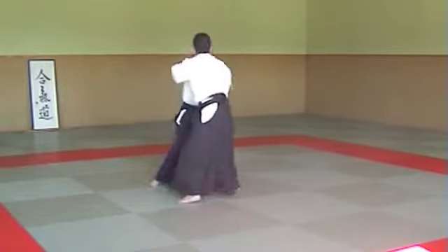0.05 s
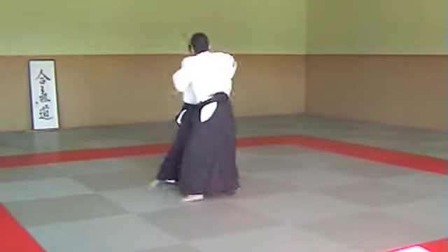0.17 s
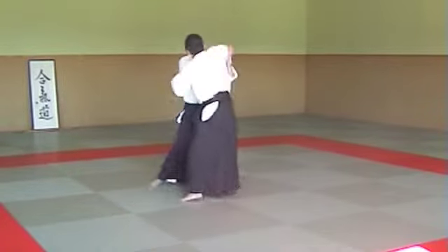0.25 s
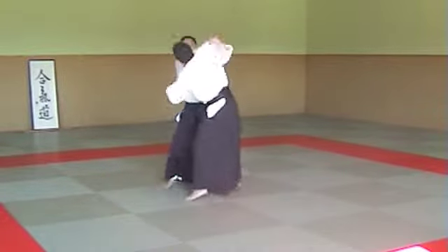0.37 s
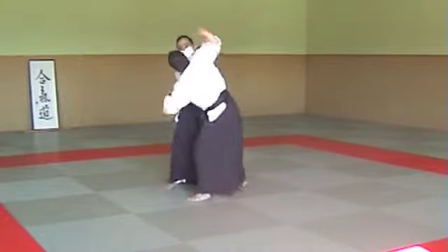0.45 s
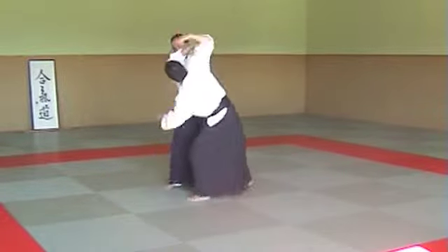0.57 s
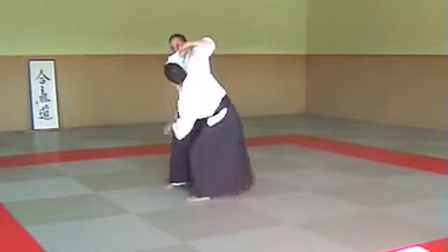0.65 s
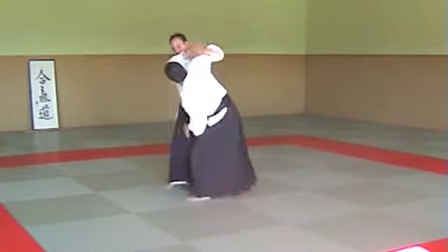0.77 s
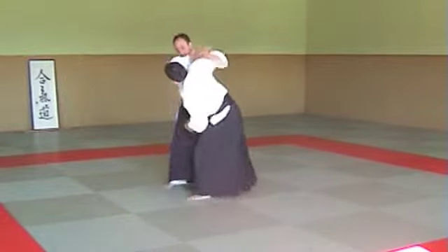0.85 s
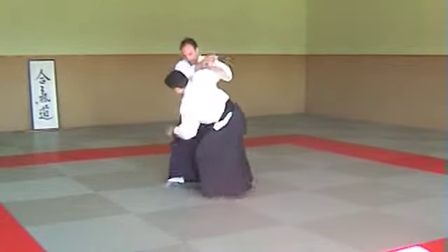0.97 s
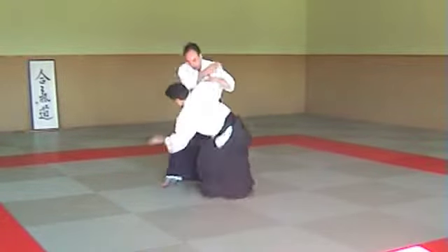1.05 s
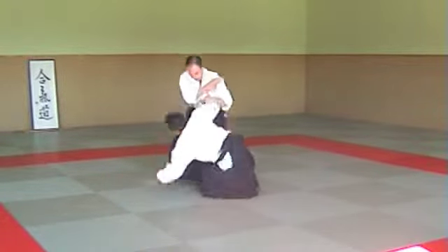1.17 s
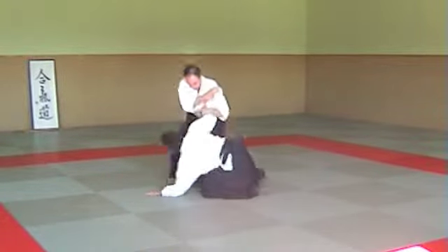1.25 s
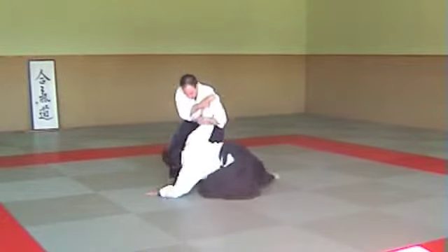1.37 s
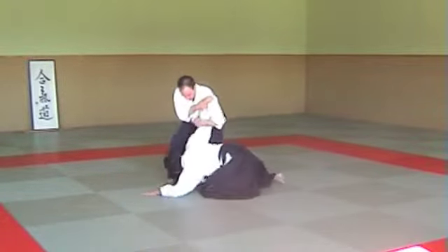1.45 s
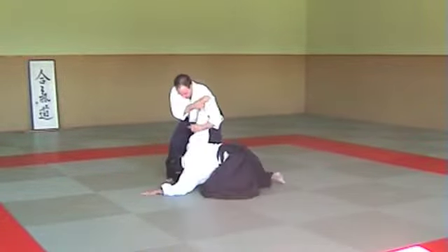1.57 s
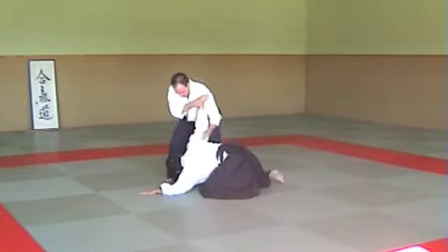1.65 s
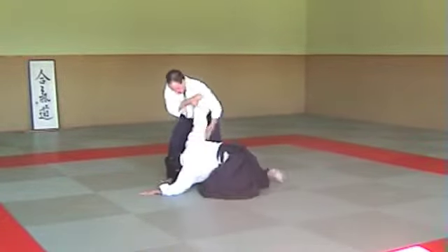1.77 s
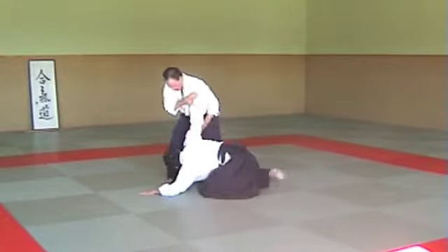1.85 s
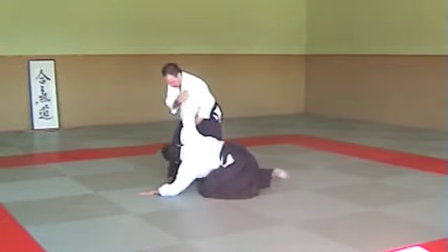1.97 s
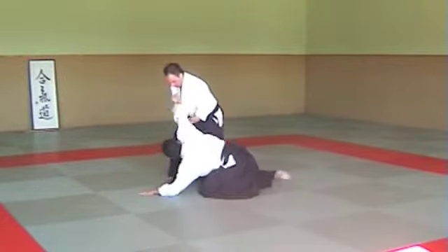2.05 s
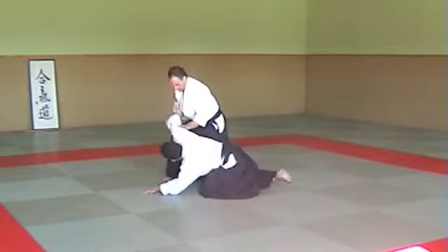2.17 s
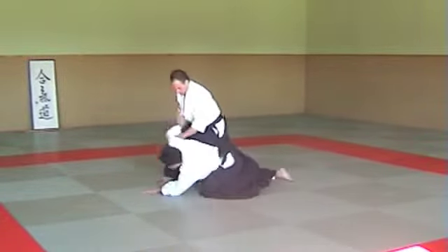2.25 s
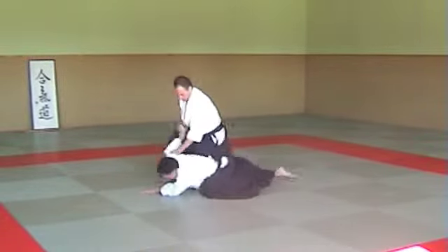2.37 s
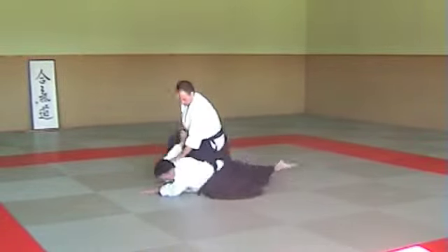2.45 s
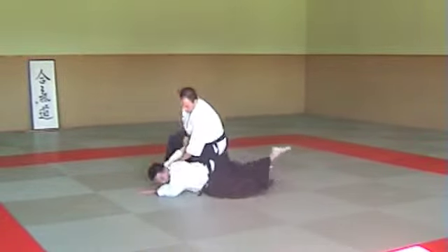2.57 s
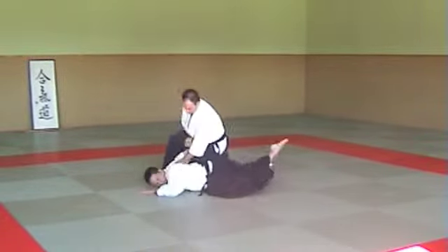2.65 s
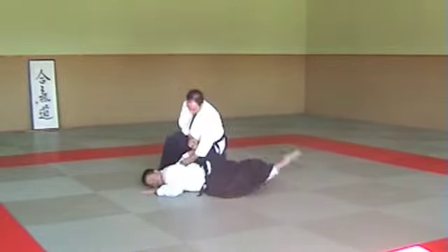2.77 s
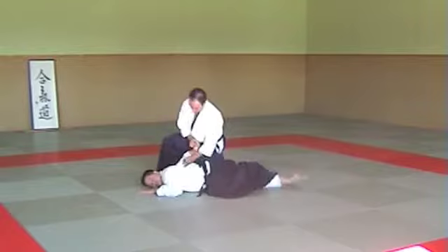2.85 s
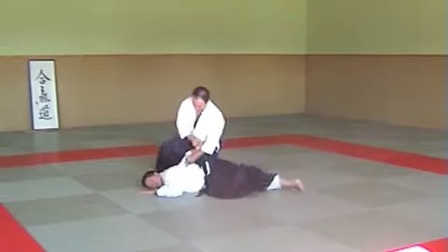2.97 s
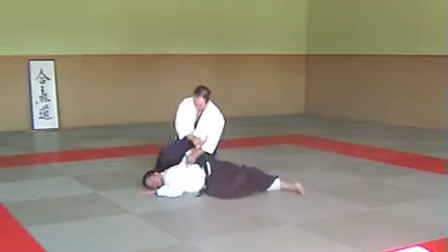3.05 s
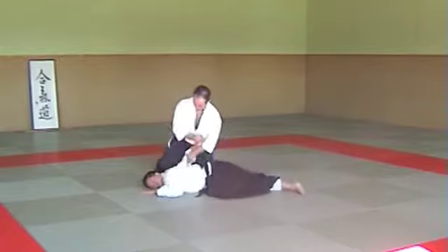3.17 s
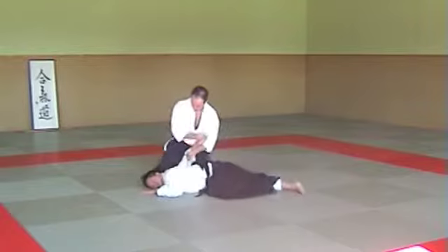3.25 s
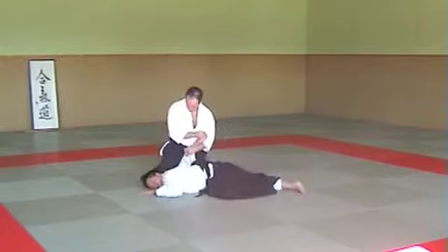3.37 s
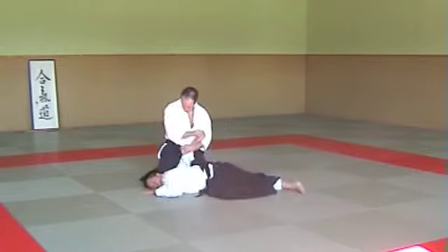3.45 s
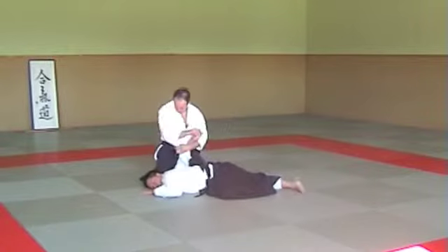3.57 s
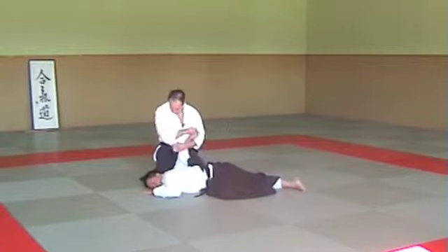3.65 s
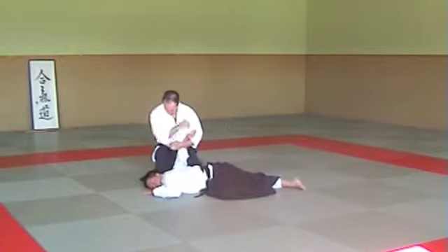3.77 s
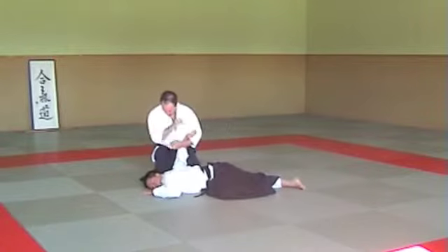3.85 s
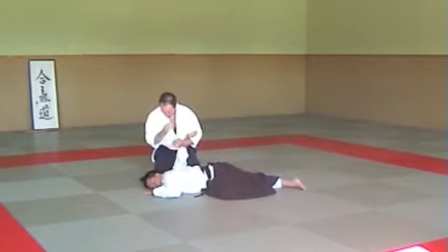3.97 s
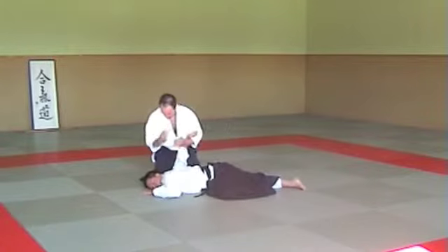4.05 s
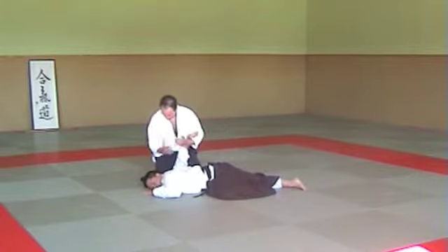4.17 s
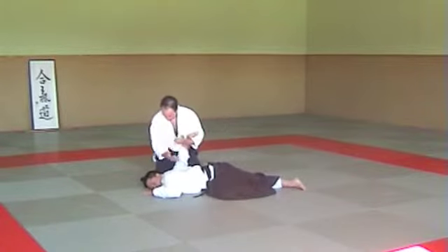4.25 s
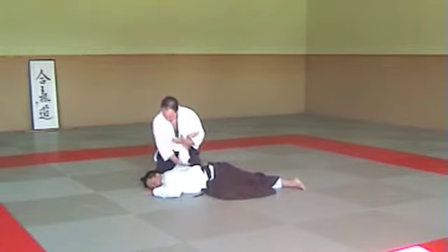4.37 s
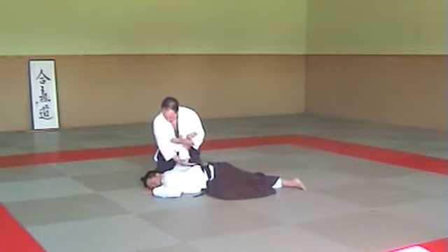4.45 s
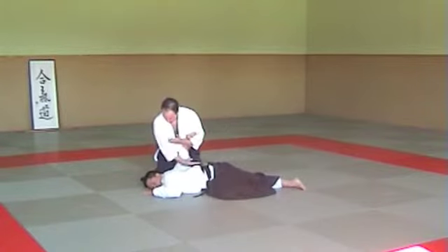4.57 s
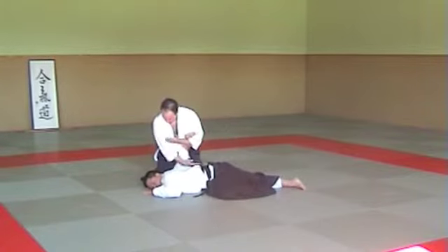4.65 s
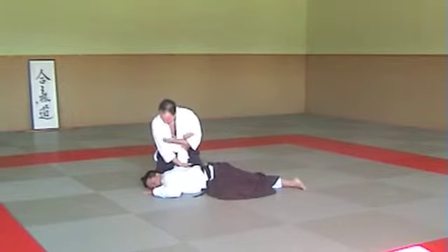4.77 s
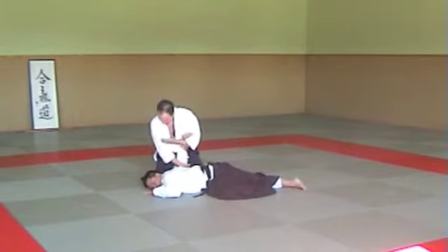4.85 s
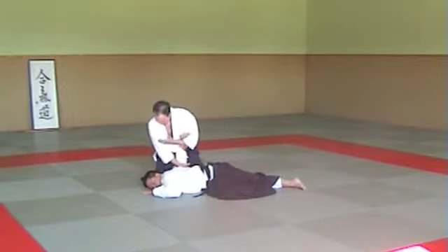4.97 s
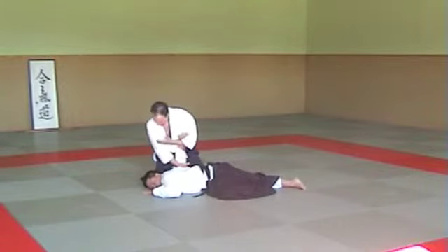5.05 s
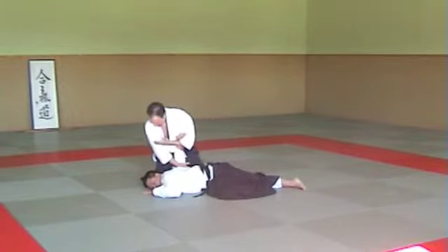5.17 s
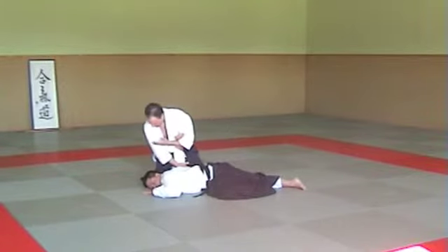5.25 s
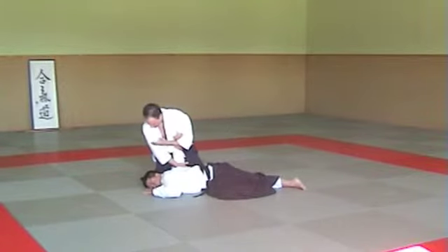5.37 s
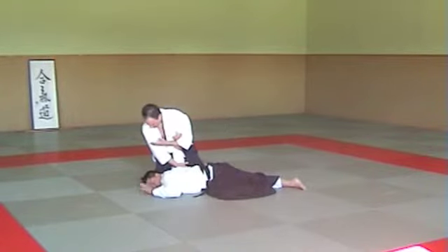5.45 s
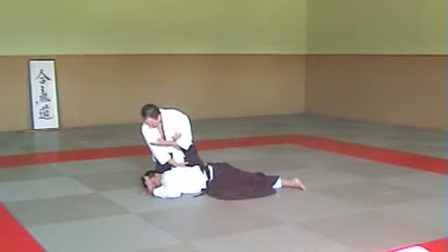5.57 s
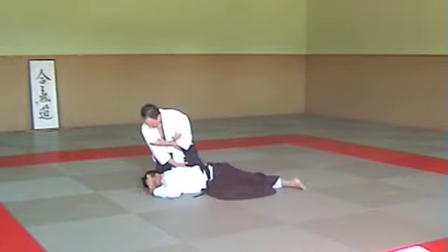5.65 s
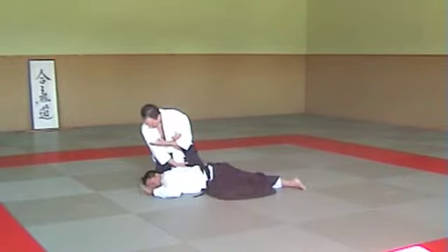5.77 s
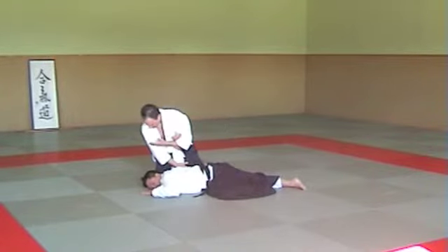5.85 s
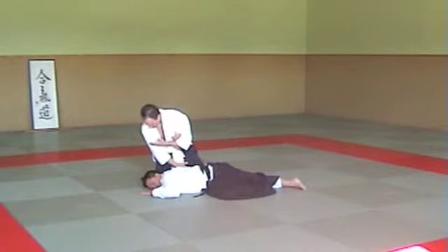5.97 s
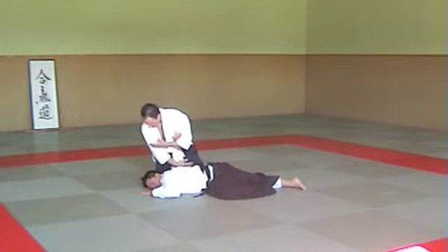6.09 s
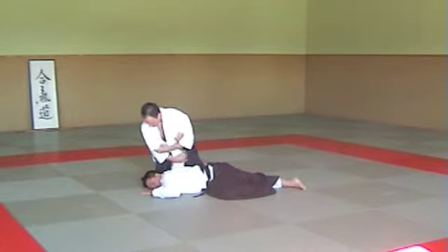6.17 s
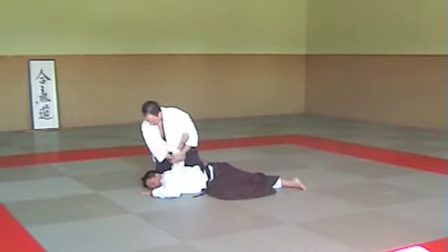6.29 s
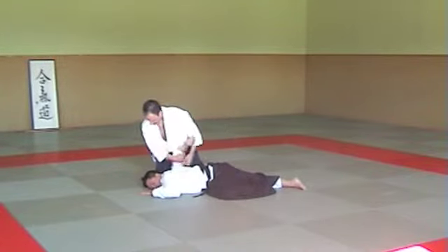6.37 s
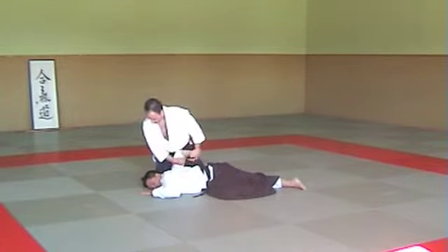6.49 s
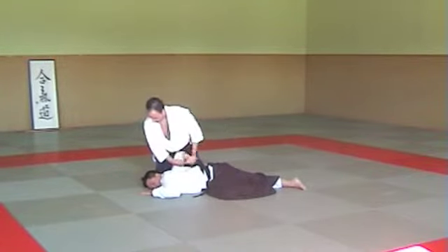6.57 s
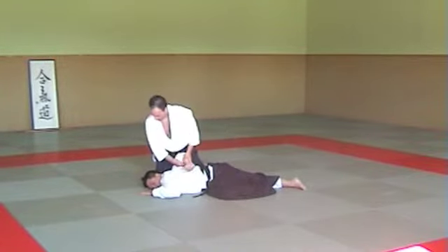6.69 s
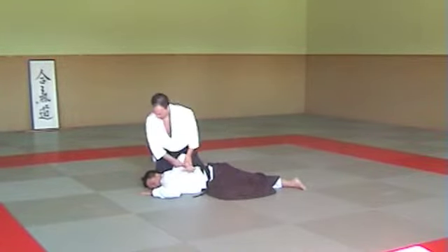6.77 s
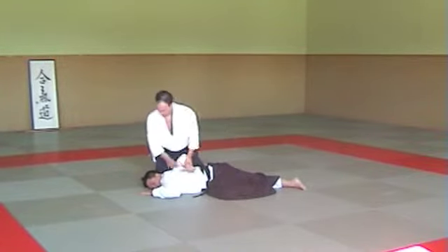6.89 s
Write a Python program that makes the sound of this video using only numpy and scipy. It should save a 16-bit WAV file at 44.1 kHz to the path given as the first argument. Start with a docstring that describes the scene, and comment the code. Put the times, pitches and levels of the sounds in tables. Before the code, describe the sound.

Bare feet slide and step on padded mats while heavy cotton rustles and air rumbles softly over the microphones. A body drops with a loud thump and slap, then is put down flat with a lighter smack. After a quieter stretch of shifting and rustling, a hand strikes the mat hard. Each blow echoes through a large training hall, heard from a few metres away.

```python
"""A body drops onto padded mats and is slapped down flat as two people practise a throw and a pin;
at the end of the pin a hand strikes the mat hard. Weight thumps the mat and rings the floor beneath,
and air squeezed from under a limb cracks. Between the blows heavy cotton rustles and bare feet slide.
The place is a large, echoing training hall, where faint tones ring now and then. A close pair of
microphones a few metres away hears mostly the hall; early on, air wafts over them in a soft rumble."""
import sys
import numpy as np
from scipy import signal
from scipy.fft import rfft, irfft, next_fast_len
from scipy.io import wavfile

SR = 44100
rng = np.random.default_rng(int(sys.argv[2]) if len(sys.argv) > 2 else 0)


def dump_mix(stems):
    """Bounce the given channels to the path in sys.argv[1] as a 16-bit WAV at rate SR."""
    frames = np.atleast_2d(stems).T  # one column per channel
    limited = np.clip(frames, -1, 1)  # hard clip at full scale
    pcm = np.round(limited * 32767).astype(np.int16)
    wavfile.write(sys.argv[1], SR, pcm)


N = 305172
TIME = np.arange(N) / SR

# Room tone and microphone hiss. Each row: frequency in Hz, relative spectral level in dB.
AIR_COLOUR = [(15, -57), (25, -3.5), (79, -16), (110, -2.5), (421, -4.5), (482, 1.5), (804, -8.5),
              (1050, -6), (1170, -8.5), (1570, -14), (1710, -14.5), (3440, -20), (15500, -26.5)]
# Stereo width at the microphones. Each row: frequency in Hz, side minus mid in dB.
AIR_WIDTH = [(40, -7), (140, -0.5), (280, -2.5), (1100, -7.5), (2200, -5), (4400, -3), (14000, 0)]  # room tone and draught
HALL_WIDTH = [(40, -13.5), (140, -33), (280, -26.5), (1100, -15), (2200, -11.5), (4400, -6), (8000, -0.5),
              (14000, -2.5)]  # the hall's wash and all rubbing

# Swells of noise. Each row: peak time in seconds, relative level in dB, rise and fall in seconds.
MIC_DRAUGHTS = [(.08, -46.5, 0.67, 0.41), (.62, -49.5, 0.43, 0.34), (1.01, -48.5, .08, 0.06),
                (1.2, -42, .16, 0.4)]  # air wafting over the microphones
SOLE_SLIDES = [(.036, -45, 0.3, 0.19), (.18, -44, .04, 0.29), (.488, -42.5, 0.039, 0.17),
               (.72, -49, 0.54, 0.28), (1.2, -48.5, 0.22, 0.81), (2.23, -46.5, .015, 0.04),
               (2.32, -48, .1, .4), (2.7, -53.5, .2, 0.66)]  # bare feet stepping and turning
JACKET_RUSTLES = [(.202, -44, 0.16, 0.081), (.476, -44, 0.061, 0.16), (.774, -59, 0.059, 0.11),
                  (1.055, -44.5, .08, .12), (1.18, -53.5, 0.12, 0.26), (2.102, -53.5, 0.16, 0.14),
                  (2.356, -53, .1, 0.18), (2.674, -58.5, 0.26, 0.24), (2.97, -66, .25, .05),
                  (3.83, -59.5, 0.72, 0.39), (6.88, -63, .15, .3)]  # one for each movement of the arms
WEIGHT_SHIFTS = [(2.25, -43.5, 0.12, 0.28), (2.63, -42.5, 0.85, 0.41), (2.99, -36.5, 0.033, 0.52),
                 (3.7, -49.5, 0.9, 0.31), (4.12, -46, 1, 0.33), (5.05, -55, 0.19, 0.53),
                 (5.3, -57, .04, 0.38)]  # knees and bodies
# The spectra of those swells. Each row: frequency in Hz, relative spectral level in dB.
DRAUGHT_COLOUR = [(25, -1), (80, -6), (160, 3), (320, 2), (600, 1.5), (1100, -11), (2000, -13.5),
                  (6000, -60)]
SOLE_COLOUR = [(300, -6.5), (1200, -4), (2500, 1.5), (4500, -2), (7000, -7), (15000, -20)]
JACKET_COLOUR = [(300, -13), (1000, -2.5), (2500, -1), (5000, 2), (8000, 2), (12000, -5.5), (16000, -15.5)]
SHIFT_COLOUR = [(25, 3), (80, -23), (160, -3.5), (320, 2), (600, -1), (1100, -8.5), (2000, -13.5),
                (6000, -33)]

# Weight meeting the mat. Each row: start in seconds, relative thump level in dB,
# contact cut-off in Hz, relative level of the floor's boom in dB.
THUMPS = [(0.043, -25.5, 219, -37), (0.244, -31.5, 300, -41), (0.661, -38, 400, -51),
          (1.154, -33, 250, -36), (1.293, -17, 550, -18), (1.329, -6, 664, -14), (1.341, 4, 405, -9.5),
          (2.27, -33, 400, -32), (2.471, -28, 303, -28.5), (2.542, -30, 197, -30), (3.022, -15, 400, -11.5),
          (3.09, -12, 262, -14), (5.291, -34.5, 900, -61), (5.930, -8.5, 564, -16), (5.943, 3, 280, -21)]
# The heavily damped mat on its floor. Each row: frequency in Hz, relative spectral level in dB.
MAT_COLOUR = [(30, -49), (70, -19.5), (110, -15), (145, -4.5), (190, 1.5), (235, 0.5), (290, 3.5),
              (350, -2.5), (430, -3), (560, -12.5), (900, -37), (3000, -20)]
# The floor beneath. Each row: frequency in Hz, relative level in dB, time to fall 60 dB in seconds.
FLOOR_MODES = [(37.2, 4.5, 0.57), (54, 2.5, 0.35), (75.6, -8, 0.21), (118, 0.5, 0.1)]

# Skin and cloth smacking the mat's cover. Each row: start in seconds, relative level in dB, contact
# time in seconds, ring frequency in Hz, ring gain in dB, cut-off in Hz, send to the hall in dB.
SLAPS = [(0.586, -35, 0.0021, 5800, -4, 12000, 5), (1.258, -18.5, 0.027, 1000, 4, 1800, 6),
         (1.327, 2, .0016, 4500, 0, 8600, 1.5), (1.334, -7.5, .005, 930, 13.5, 1670, 2),
         (2.222, -38, 0.0045, 6950, -16, 13000, 15), (3.0149, -15.5, 0.0024, 543, -4.5, 9000, -24),
         (3.0212, -5.5, 0.0011, 3100, -1.5, 7450, 2), (3.028, -18, 0.0023, 540, 17.5, 1400, 0.5),
         (3.199, -25.5, 0.0041, 8600, -24, 11700, 5), (5.29, -31.5, 0.0071, 447, -1, 713, 7),
         (5.9283, -6.5, 0.0015, 6470, -3.5, 8140, 5), (5.934, -12, 0.0051, 2400, 4, 2820, 3),
         (5.97, -10.5, 0.0097, 1200, 10, 1700, 1)]
# The spectrum all slaps share. Each row: frequency in Hz, relative spectral level in dB.
SLAP_COLOUR = [(100, -17.5), (400, 6), (900, -1), (1300, -6), (1800, -4), (2500, -5.5), (5000, -7.5),
               (7000, -9.5), (11000, -9), (16000, -9)]

# Faint tones in the hall. Each row: start in seconds, length in seconds, frequency in Hz, level in dB.
TONES = [(3.794, 0.22, 704, -53.5), (4.237, 0.15, 712, -58), (5.284, 1, 212.3, -61)]

# First reflections to reach the microphones. Each row: lag in seconds, gain in dB.
NEAR_ECHOES = [(.006, -12), (.0118, -19.5), (.04, -20)]  # off the floor and nearby surfaces
WALL_ECHOES = [(.036, -5), (.074, -6), (.136, -7), (.28, -13)]  # walls and ceiling return the lows in one piece
# The hall's reverberation. Each row: frequency in Hz, time to fall 60 dB in seconds.
HALL_T60 = [(40, 1.22), (100, 1.82), (200, 1.79), (320, 2.31), (600, 1.56), (1200, 1.31), (2500, 1.62),
            (4500, 1.376), (8000, 0.95), (14000, 0.54)]


def undb(db):
    """Decibels to gain."""
    return 10 ** (np.asarray(db) / 20)


def unit(x):
    """Scale a short sound to an energy of one."""
    return x / np.sqrt(np.sum(x ** 2))


def along(points, hz):
    """Read a (Hz, value) table on a log-frequency axis."""
    f, value = np.transpose(points)
    return np.interp(np.log(hz), np.log(f), value)


def convolve(x, response):
    """Pass one or two channels through a response."""
    return signal.fftconvolve(np.atleast_2d(x), np.atleast_2d(response), axes=1)[:, :N]


def colour(x, points, size=8192):
    """Minimum-phase filter with the given spectrum and unit energy."""
    hz = np.maximum(np.arange(size // 2 + 1) * SR / size, 1)
    cepstrum = irfft(np.log(undb(along(points, hz))))
    response = irfft(np.exp(rfft(2 * cepstrum[:size // 2], size)))
    return convolve(x, unit(response))


def lowpass(x, hz):
    """Gentle two-pole low-pass."""
    return signal.sosfilt(signal.butter(2, min(hz, 0.45 * SR), fs=SR, output="sos"), x)


def add(track, start_s, sound):
    """Mix a sound into a track at a time."""
    start = max(int(start_s * SR), 0)
    track[start:start + len(sound)] += sound[:N - start]


def wander(per_second, size):
    """Random values joined by straight lines."""
    return np.interp(TIME[:size] * per_second, np.arange(2000), rng.standard_normal(2000))


def diffuse(widths, size):
    """Noise reaching two close microphones from all sides, with a given width in each band."""
    hz = np.maximum(np.arange(size // 2 + 1) * SR / size, 1)
    mid, side = rfft(rng.standard_normal((2, size)))
    share = undb(along(widths, hz))
    left_right = mid + np.array([[1], [-1]]) * share * side
    return irfft(left_right / np.sqrt(1 + share ** 2), size)


def envelope(swells, drop_db=14.5, roundness=1.05):
    """Each swell rises, peaks and falls again; overlapping swells add their power."""
    power = 0
    for peak_s, db, rise_s, fall_s in swells:
        from_peak = np.maximum((peak_s - TIME) / rise_s, (TIME - peak_s) / fall_s)
        power = power + undb(db - drop_db * from_peak ** roundness) ** 2
    return np.sqrt(power)


def grainy(swells, spectrum, widths, gain_db, grain_db, jerk_db):
    """Coloured noise in tiny grains of uneven size, following its swells unsteadily."""
    sizes = undb(grain_db * rng.standard_normal(N // 20 + 1))
    grains = np.repeat(sizes, 20)[:N] * diffuse(widths, N)  # a grain lasts 20 samples
    noise = colour(grains / grains.std(), spectrum)
    jerks = jerk_db * wander(per_second=50, size=N)
    return noise * envelope(swells) * undb(gain_db + jerks)


def room_tone(level_db=-54):
    """The still hall and the hiss of the microphones."""
    return colour(diffuse(AIR_WIDTH, N), AIR_COLOUR) * undb(level_db)


def draught():
    """A soft, wide rumble of air wafting over the microphones."""
    return grainy(MIC_DRAUGHTS, DRAUGHT_COLOUR, AIR_WIDTH, gain_db=0.5, grain_db=0.5, jerk_db=-0.5)


def rubbing():
    """Skin and countless fibres catch and let go, following the jerky effort of each movement."""
    soles = grainy(SOLE_SLIDES, SOLE_COLOUR, HALL_WIDTH, gain_db=-3, grain_db=1.5, jerk_db=1.5)
    jackets = grainy(JACKET_RUSTLES, JACKET_COLOUR, HALL_WIDTH, gain_db=0.5, grain_db=2, jerk_db=3.5)
    shifts = grainy(WEIGHT_SHIFTS, SHIFT_COLOUR, HALL_WIDTH, gain_db=-6.5, grain_db=2.5, jerk_db=3.5)
    return soles + jackets + shifts


def floor_ring():
    """One push sets the floor's damped modes going, in alternating polarity."""
    t = TIME[:SR // 2]
    ring = 0
    for k, (hz, db, t60) in enumerate(FLOOR_MODES):
        mode = np.sin(2 * np.pi * hz * t) * np.exp(-np.log(1000) * t / t60)
        ring = ring + (-1) ** k * undb(db) * unit(mode)
    return unit(ring)


def thumps(mat_gain_db=17, floor_gain_db=11):
    """A soft, heavy contact drives the mat and rings the floor under it; the softer, the duller."""
    push, boom = np.zeros((2, N))
    floor = floor_ring()
    for start_s, thump_db, contact_hz, boom_db in THUMPS:
        contact = lowpass(signal.unit_impulse(SR // 20), contact_hz)
        add(push, start_s, undb(thump_db) * contact)
        add(boom, start_s, undb(boom_db) * floor)
    return undb(mat_gain_db) * colour(push, MAT_COLOUR) + undb(floor_gain_db) * boom


def crackle(contact_s, size=SR // 10):
    """A contact closes unevenly: every frequency equally strong, each arriving at its own moment."""
    hz = np.arange(size // 2 + 1) * SR / size
    moments = contact_s * (.8 + rng.exponential(size=1000) / 3)
    delay_s = np.interp(hz * contact_s, np.arange(len(moments)), moments)
    phase = -2 * np.pi * np.cumsum(delay_s) * SR / size
    return irfft(np.exp(1j * phase), size)


def spatter(decay_s):
    """Loose cloth patters down just after a contact."""
    age = TIME[:SR // 10] / decay_s
    return unit(rng.standard_normal(len(age)) * np.sqrt(age) * np.exp(-age))


def slaps(gain_db=12, ring_q=3, spatter_db=-6, spatter_stretch=2.6):
    """Air squeezed from under a limb cracks and rings in the gap, towards microphones and hall."""
    to_mics, to_hall = np.zeros((2, N))
    for start_s, db, contact_s, ring_hz, ring_db, top_hz, hall_db in SLAPS:
        parts = np.array([crackle(contact_s), spatter(spatter_stretch * contact_s)])
        gap_ring = signal.lfilter(*signal.iirpeak(ring_hz, ring_q, fs=SR), parts)
        ringing = parts + undb(ring_db) * gap_ring
        crack, cloth = (lowpass(unit(part), top_hz) * undb(gain_db + db) for part in ringing)
        add(to_mics, start_s, crack + undb(spatter_db) * cloth)
        add(to_hall, start_s, crack * undb(hall_db))
    return colour(to_mics, SLAP_COLOUR), colour(to_hall, SLAP_COLOUR)


def faint_tones(waver_hz=0.67):
    """Faint wavering tones swell and fade somewhere in the building."""
    track = np.zeros(N)
    for start_s, length_s, hz, db in TONES:
        t = TIME[:int(length_s * SR)]
        drift = lowpass(rng.standard_normal(N), hz=26)
        pitch_hz = hz + waver_hz * drift[-len(t):] / drift.std()
        phase = 2 * np.pi * np.cumsum(pitch_hz) / SR
        swell = np.sqrt(2 * np.sin(np.pi * t / length_s))
        add(track, start_s, undb(db) * swell * np.sin(phase))
    return track


def off_axis(x, lag_s=1.2e-5):
    """Sound from slightly off axis reaches the right microphone a little later."""
    size = next_fast_len(N)
    hz = np.arange(size // 2 + 1) * SR / size
    delays = np.exp(-2j * np.pi * hz * np.array([[0], [lag_s]]))
    return irfft(rfft(x, size) * delays, size)[:, :N]


def echoes(reflections):
    """Each surface returns one delayed, weaker copy: a response of single spikes."""
    response = np.zeros(SR // 2)
    for lag_s, db in reflections:
        add(response, lag_s, undb([db]))
    return response


def hall_tail(build_s=0.0021, gap_s=0.0027, bunch_db=2, bunch_fade_s=0.29):
    """The hall's diffuse response: quarter-octave bands, each dying at its own rate."""
    t = TIME[:2 * SR]
    noise = rfft(diffuse(HALL_WIDTH, len(t)))
    octave = np.log2(np.maximum(np.arange(noise.shape[1]) * SR / len(t), 32))
    tail = 0
    for centre in np.arange(5, 14.2, .25):  # 32 Hz to 16 kHz
        band = irfft(noise * np.maximum(1 - 4 * abs(octave - centre), 0))
        tail = tail + band * np.exp(-np.log(1000) * t / along(HALL_T60, 2 ** centre))
    # the earlier reflections still come in bunches
    bunches = undb(bunch_db * wander(per_second=200, size=len(t)) * np.exp(-t / bunch_fade_s))
    onset = 1 - np.exp(-np.maximum(t - gap_s, 0) / build_s)
    return tail * bunches * onset / np.sqrt(SR / 10)


def scene(blow_send_db=1, soft_send_db=-2, wall_cutoff_hz=700):
    """From a few metres off, the mat is heard directly, by a few reflections and as the hall's wash."""
    thump = thumps()
    slap, slap_to_hall = slaps()
    soft = rubbing() + draught()
    direct = off_axis(thump + slap) + soft
    early = convolve(direct, echoes(NEAR_ECHOES) + lowpass(echoes(WALL_ECHOES), wall_cutoff_hz))
    to_hall = undb(blow_send_db) * (thump + slap_to_hall) + undb(soft_send_db) * soft
    wash = convolve(to_hall, hall_tail())
    return direct + early + wash + faint_tones() + room_tone()


def record(dry, low_cut_hz=31, ceiling=0.8, top_hz=15800):
    """The microphone chain thins the deepest bass, rounds the highest peaks and cuts the top."""
    thinned = signal.sosfilt(signal.butter(4, low_cut_hz, "highpass", fs=SR, output="sos"), dry)
    rounded = thinned / (1 + (thinned / ceiling) ** 4) ** .25
    return signal.sosfilt(signal.ellip(10, .1, 80, top_hz, fs=SR, output="sos"), rounded)


dry = scene()
out = record(dry)
dump_mix(out)
```